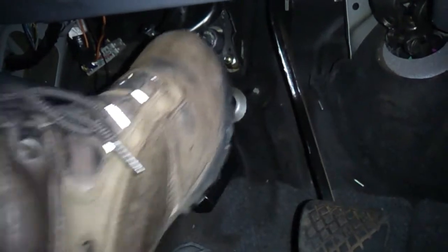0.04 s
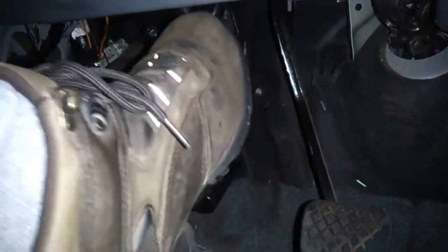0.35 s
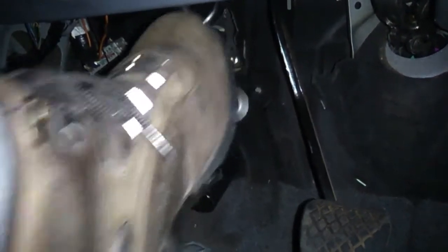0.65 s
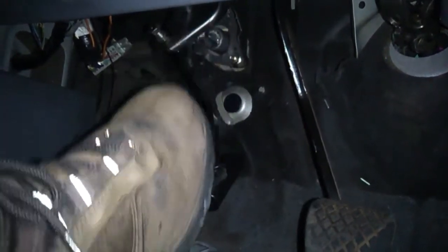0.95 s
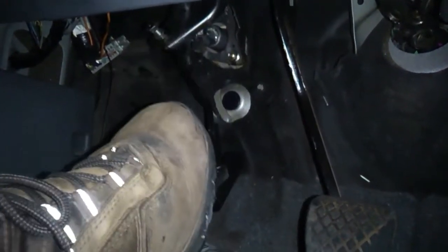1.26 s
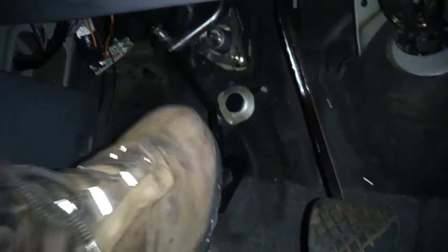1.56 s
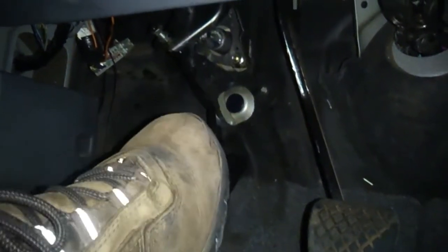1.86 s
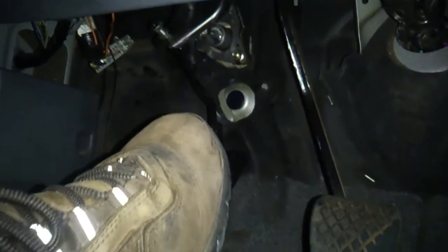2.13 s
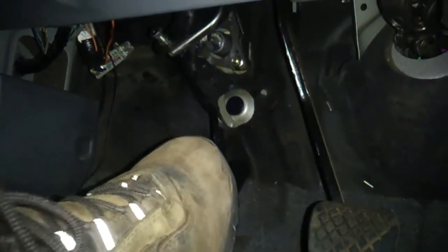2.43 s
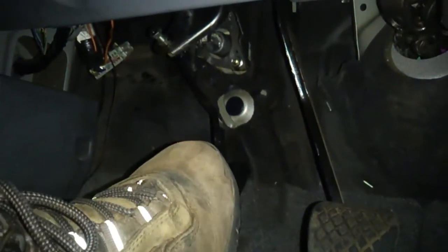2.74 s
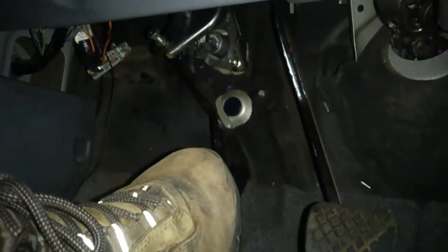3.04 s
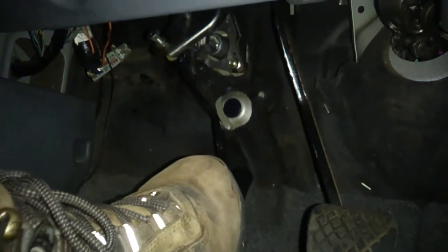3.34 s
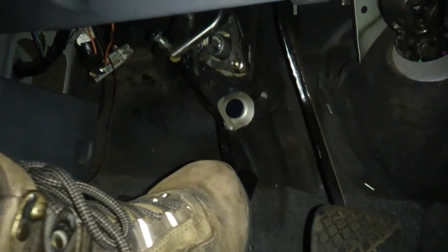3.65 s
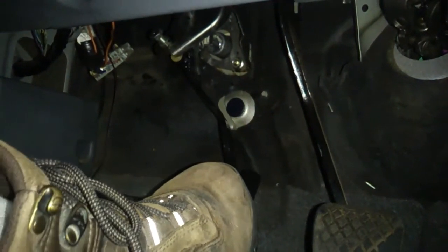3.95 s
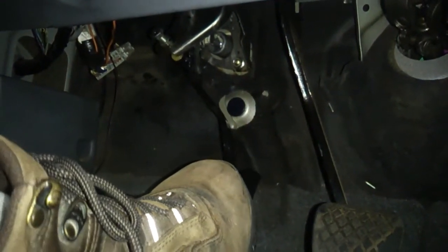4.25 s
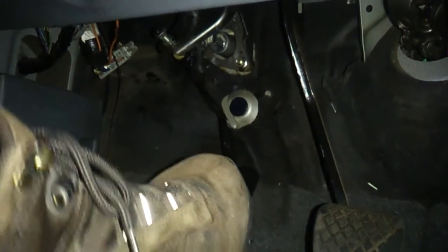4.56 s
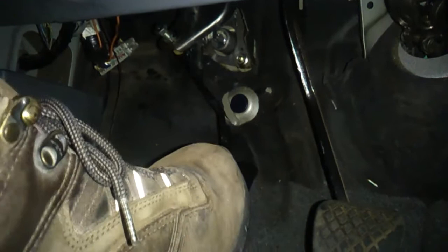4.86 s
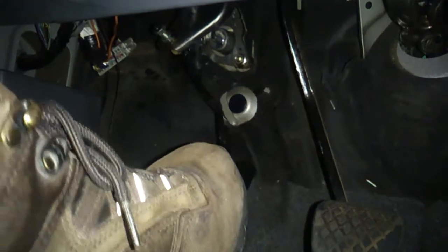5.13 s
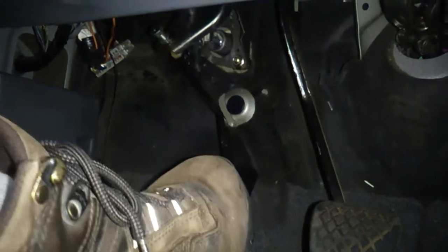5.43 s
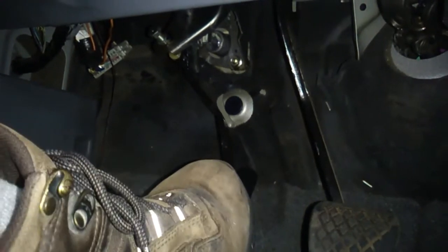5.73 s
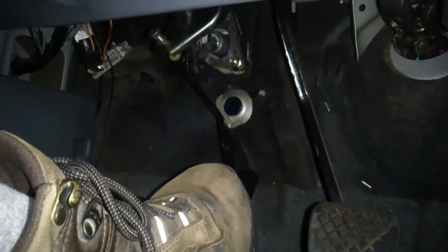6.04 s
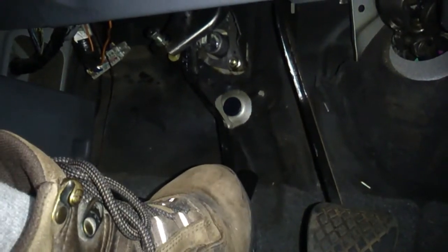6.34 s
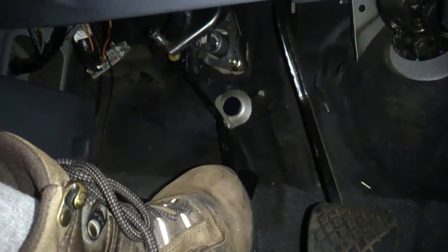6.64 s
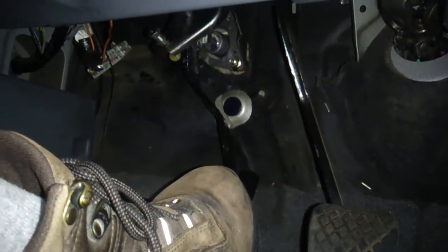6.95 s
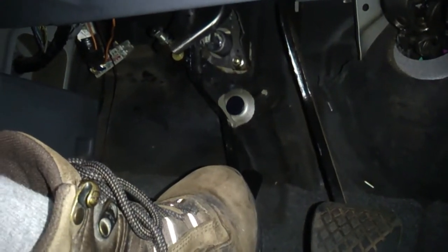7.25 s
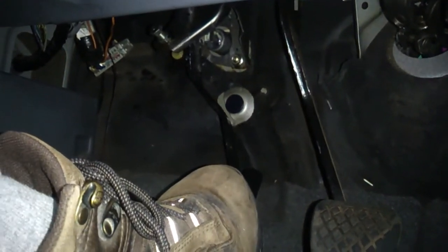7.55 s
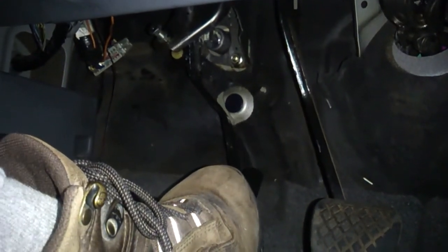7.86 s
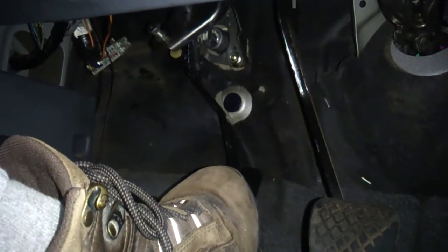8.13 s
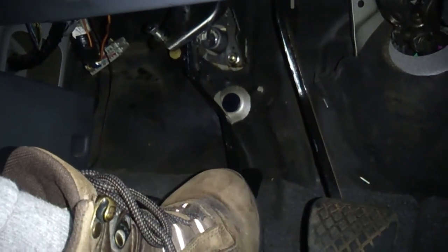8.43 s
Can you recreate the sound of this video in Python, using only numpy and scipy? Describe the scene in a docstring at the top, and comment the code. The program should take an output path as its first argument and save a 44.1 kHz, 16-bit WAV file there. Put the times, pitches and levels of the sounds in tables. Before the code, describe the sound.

Close microphones in a car footwell pick up a boot scuffing and ticking lightly on a pedal, with dull knocks and one heavier, booming thud. From about halfway, the clutch pedal gives five crisp metallic clicks at a slow, fairly regular pace as it is worked. Behind this are a steady faint hiss, a low cabin rumble and two brief spells of distant engine hum.

```python
"""In the footwell of a parked car, a boot presses and releases the clutch pedal, which clicks
sharply as it snaps against its bracket. Before that the boot shifts with small ticks, rubs and
dull knocks; the heaviest knock makes the cabin boom. Beneath it all lie a faint low rumble,
a distant engine and the hiss of two close microphones."""
import sys
import numpy as np
from scipy import signal
from scipy.fft import rfft, irfft, next_fast_len
from scipy.io import wavfile
from scipy.ndimage import uniform_filter1d

SR = 44100
rng = np.random.default_rng(int(sys.argv[2]) if len(sys.argv) > 2 else 0)


def wav_record(signal):
    """Record a signal, one row per channel, as 16-bit PCM in the file named by sys.argv[1]."""
    frames = np.transpose(np.atleast_2d(signal))
    bounded = np.clip(frames, -1, 1)
    # unit amplitude maps onto the largest positive 16-bit level
    quanta = np.round(bounded * 32767).astype(np.int16)
    wavfile.write(sys.argv[1], SR, quanta)


N = 374409


def amp(db):
    """Turn decibels into a number to multiply by."""
    return 10 ** (np.asarray(db) / 20)


def unit(x):
    """Scale a signal to an average strength (rms) of 1."""
    return x / np.sqrt(np.mean(x ** 2) + 1e-20)


def along(points, hz):
    """Read between (frequency, value) points, with the octaves evenly spaced."""
    freqs, values = np.transpose(points)
    return np.interp(np.log(hz + 1), np.log(freqs), values)


def filtered(x, response):
    """Turn each frequency in x up or down by response(hz)."""
    size = x.shape[-1]
    padded = next_fast_len(size + SR // 10)
    gain = response(np.fft.rfftfreq(padded, 1 / SR))
    return irfft(rfft(x, padded) * gain, padded)[..., :size]


def noise(spectrum, size, apart_hz):
    """Stereo noise of strength 1; left and right are alike below apart_hz and differ above it."""
    mid, side = rng.standard_normal((2, size))
    spread = lambda hz: np.pi / 4 * hz / np.hypot(hz, apart_hz)
    mid = filtered(mid, lambda hz: amp(along(spectrum, hz)) * np.cos(spread(hz)))
    side = filtered(side, lambda hz: amp(along(spectrum, hz)) * np.sin(spread(hz)))
    return unit(np.array([mid + side, mid - side]))


def strike(t, rise_s, ring_s):
    """Loudness of a blow: it builds over rise_s and dies away by 60 dB in the ring time, ring_s."""
    return (1 - np.exp(-(t / rise_s) ** 2)) * amp(-60 * t / ring_s)


def add(track, at_s, sound):
    """Mix a sound into the track at the given time."""
    start = round(at_s * SR)
    part = sound[..., :N - start]
    track[:, start:start + part.shape[-1]] += part


# The tone of the hiss: (frequency [Hz], relative level [dB])
HISS_TONE = [(100, 10.5), (500, 7), (1000, 4.5), (2000, 1.5), (2700, 2.5), (4000, 0), (8000, 0),
             (12000, -3), (13800, -1), (16000, -5.5)]

def hiss():
    """The microphones hiss steadily."""
    return amp(-59.5) * amp([[-.5], [.5]]) * noise(HISS_TONE, N, apart_hz=515)


# How the rumble rises and falls: (time [s], level [dB])
RUMBLE_LOUDNESS = [(0, -48.5), (2.2, -45), (2.7, -49.5), (5.8, -49), (6.4, -47), (8.49, -48)]
# The tone of the rumble: (frequency [Hz], relative level [dB])
RUMBLE_TONE = [(12, -12.5), (18, 4.5), (26, -6), (34, 1.5), (44, -3.5), (60, 1.5), (78, -4.5), (110, -10.5),
               (150, -19), (250, -24), (500, -32), (1200, -51)]

def rumble():
    """A low rumble fills the cabin, its deepest part stronger on the right."""
    level_db = np.interp(np.arange(N) / SR, *np.transpose(RUMBLE_LOUDNESS))
    bass = noise(RUMBLE_TONE, N, apart_hz=112)
    lean_db = lambda hz: along([(40, 5.0), (130, -1.5)], hz)
    return amp(level_db) * filtered(bass, lambda hz: amp([-lean_db(hz), lean_db(hz)]))


# The two spells of engine hum: (start [s], length [s], first firing rate [Hz], final rate [Hz],
# settling time [s], level [dB], fade [dB/s], octave above against the main note [dB])
ENGINE_SPELLS = [(0, 2, 48.94, 62.2, .65, -46.5, -3.5, -10.5),
                 (3.88, 2.4, 75.12, 59.53, 0.3018, -47.5, -3.5, -30)]

def engine(swell_s=0.21):
    """A distant engine speeds up and later slows; only its two lowest tones get into the cabin."""
    out = np.zeros((2, N))
    for at_s, length, first_hz, final_hz, settle_s, db, fade_db_per_s, octave_db in ENGINE_SPELLS:
        t = np.arange(round(length * SR)) / SR
        firing_hz = final_hz + (first_hz - final_hz) * np.exp(-t / settle_s)
        phase = 2 * np.pi * np.cumsum(firing_hz) / SR
        hum = np.sin(phase) + amp(octave_db) * np.sin(2 * phase)
        swell = np.clip(np.minimum(t, length - t) / swell_s, 0, 1)
        loudness = swell * amp(db + fade_db_per_s * t)
        add(out, at_s, np.sqrt(2) * amp([[-2.5], [2]]) * loudness * hum)
    return out


def contact(bright_tone, bright_loudness, dull_tone, dull_loudness):
    """Boot on pedal: bright noise aimed at the right microphone, and dull noise that reaches both."""
    size = len(bright_loudness)
    bright = amp([[-10], [3]]) * noise(bright_tone, size, apart_hz=900)
    dull = noise(dull_tone, size, apart_hz=1070)
    return bright * bright_loudness + dull * dull_loudness


# Slides of the sole: (middle [s], length [s], dull level [dB], bright level [dB])
SOLE_RUBS = [(0.513, 0.34, -63.5, -65), (1.045, 0.037, -61, -72), (1.156, 0.087, -64, -66),
             (2.211, 0.063, -52.5, -66), (4.647, 0.079, -65, -61), (4.766, 0.22, -80, -60),
             (5.345, 0.09, -81, -62.5)]
# The dull and bright parts of a rub: (frequency [Hz], relative level [dB])
SCUFF_TONE = [(150, 0), (380, 4), (650, -8), (950, -5), (1500, -15), (2500, -29), (8000, -32)]
SWISH_TONE = [(500, -21), (3500, -5), (6000, -3), (8500, 2), (12000, -5), (16000, -10)]

def rubs():
    """The sole slides over the pedal pad and its tread catches unevenly."""
    out = np.zeros((2, N))
    t = np.arange(SR // 2) / SR - 1 / 4  # zero at the middle of the rub
    for at_s, length, dull_db, bright_db in SOLE_RUBS:
        stroke = np.exp(-(2 * t / length) ** 2)
        wobble = unit(uniform_filter1d(rng.standard_normal(len(t)), size=200))
        grip = unit(amp(2.3 * wobble))
        rub = contact(SWISH_TONE, amp(bright_db) * stroke * grip, SCUFF_TONE, amp(dull_db) * stroke)
        add(out, at_s + t[0], rub)
    return out


# The bright snap of a tap: (frequency [times the strongest one], relative level [dB])
SNAP_TONE = [(.025, -33), (.4, -27), (.7, -9), (.87, 0), (1, 5.5), (1.15, -5), (1.4, -8), (2, -18)]
# The dull body of a tap: (frequency [Hz], relative level [dB])
BODY_TONE = [(60, 14), (170, -6), (330, -0.5), (700, -6), (1400, -9.5), (4000, -13.5), (10000, -23)]

def tap(snap_db, peak_hz, body_db, rise_s=0.00098, ring_s=0.026):
    """One touch: a bright snap over a dull body that builds and dies more slowly."""
    t = np.arange(SR // 4) / SR
    snap = amp(snap_db) * strike(t, rise_s, ring_s)
    body = amp(body_db) * strike(t, 1.8 * rise_s, 2.14 * ring_s)
    return contact(np.array(SNAP_TONE) * [peak_hz, 1], snap, BODY_TONE, body)


# Single ticks: (time [s], snap level [dB], strongest snap frequency [Hz], body level [dB])
BOOT_TICKS = [(.502, -45.5, 7960, -51), (1.164, -47.5, 10000, -61), (1.222, -44, 8130, -64),
              (1.393, -40.5, 9200, -66), (2.017, -48, 8300, -65), (2.075, -47.5, 8360, -60),
              (2.468, -42.5, 8640, -61), (2.759, -32, 8440, -56), (4.570, -62, 8000, -43),
              (5.2986, -40, 7340, -57), (6.852, -49, 6000, -47)]
# Spells of fainter ticks: (start [s], end [s], count, snap level [dB], body level [dB])
FAINT_TICKS = [(0.439, 0.554, 2, -49, -57), (1.129, 1.2, 2, -51, -48), (6.104, 7.799, 5, -58, -59)]

def ticks(faint_peak_hz=8700, scatter_db=1.5):
    """Boot and pedal linkage tick as the foot shifts: some at set times, fainter ones at random."""
    out = np.zeros((2, N))
    for at_s, snap_db, peak_hz, body_db in BOOT_TICKS:
        add(out, at_s, tap(snap_db, peak_hz, body_db))
    for start, end, count, snap_db, body_db in FAINT_TICKS:
        for at_s in rng.uniform(start, end, size=round(count)):
            stray_db = scatter_db * rng.standard_normal()
            add(out, at_s, tap(snap_db + stray_db, faint_peak_hz, body_db + stray_db))
    return out


# Landings of the sole: (time [s], thud level [dB], high-note boost [dB/octave], slap level [dB])
SOLE_KNOCKS = [(0.571, -13.5, 0, -47.5), (1.588, -12.5, 4.5, -36), (1.632, 1, 0, -34.5),
               (2.306, -9, 2, -49)]
# The notes the floor rings at: (frequency [Hz], level [dB], ring time [s])
FLOOR_NOTES = [(91.4, -25.5, 0.084), (155, -32, 0.2), (238.4, -27, 0.1), (328, -27.5, 0.052),
               (483, -41, 0.066), (622, -37.5, 0.055), (1340, -39, 0.029)]

def knocks(thud_lag_s=0.001):
    """The sole slaps down and the floor thuds; a sharper landing brings out its higher notes."""
    out = np.zeros((2, N))
    t = np.arange(SR // 2) / SR
    for at_s, thud_db, boost_db, slap_db in SOLE_KNOCKS:
        # a whole sole lands more softly and for longer than a tick
        slap = tap(slap_db, peak_hz=8500, body_db=slap_db - 3, rise_s=0.0029, ring_s=0.057)
        add(out, at_s, slap)
        for hz, db, ring_s in FLOOR_NOTES:
            gain = amp(thud_db + db + boost_db * np.log2(hz / 230))
            note = np.sin(2 * np.pi * (hz * t + rng.random()))
            add(out, at_s + thud_lag_s, gain * note * strike(t, 0.006, ring_s))
    return out


def boom(peak_s=1.708, hz=39, swell_s=0.045, fade_s=0.07):
    """After the heaviest knock the air in the cabin swells in one low boom."""
    t = np.arange(N) / SR - peak_s
    swell = np.exp(-(t / np.where(t < 0, swell_s, fade_s)) ** 2)
    return amp(-21.5) * amp([[-3.5], [2.5]]) * np.cos(2 * np.pi * hz * t) * swell


# The notes of pedal and bracket: (frequency [Hz], left level [dB], right level [dB], ring time [s])
PEDAL_NOTES = [(210, -48, -43, 0.22), (327, -19, -19, 0.037), (432, -43, -37, 0.17),
               (674, -27.5, -31.5, 0.074), (787, -37, -32.5, 0.078), (1056, -51.5, -43.5, 0.14),
               (1255, -28.5, -26, 0.077), (1352, -27, -25, 0.054), (1444, -33, -24, 0.064),
               (1810, -23.5, -24.5, 0.058), (1928, -22, -25, 0.043), (1986, -29, -27.5, 0.037),
               (2330, -31, -33.5, 0.063), (2698, -21.5, -51, 0.035), (2910, -25.5, -30, 0.03),
               (3240, -22, -34, 0.049), (3690, -27, -33, 0.035), (4280, -31.5, -30.5, 0.036),
               (6290, -49, -21.5, 0.03), (6320, -48, -41, 0.022), (7250, -48, -33, .036),
               (7530, -45, -21.5, 0.034), (8000, -55, -13.5, 0.022), (8700, -47, -44, 0.02),
               (8940, -46, -23, 0.023)]

def pedal_ring(t, first_sides, scatter_db=1.0, mic_delay_s=0.00018):
    """Pedal and bracket ring; each note reaches one microphone first (+1 left, -1 right)."""
    ring = np.zeros((2, len(t)))
    for (hz, left_db, right_db, ring_s), side in zip(PEDAL_NOTES, first_sides):
        head_start = side * mic_delay_s / 2 * np.array([[1], [-1]])
        gain = amp(np.array([[left_db], [right_db]]) + scatter_db * rng.standard_normal())
        note = side * np.sin(2 * np.pi * hz * (t + head_start))
        ring += gain * note * strike(t, 0.0026, ring_s)
    return ring


# The tone of the crack in each click: (frequency [Hz], left level [dB], right level [dB])
CRACK_TONE = [(81.4, 8, 2.5), (300.1, 8.5, 8), (610, 7.5, 6), (1030, 4, 2.5), (1500, -1, -1.5),
              (2020, 9.5, 4), (2500, 6.5, 1.5), (3400, 6.5, 7), (5130, -4.5, 4.5), (6660, -3, 7.5),
              (8700, -7, 13), (10230, -19, 0), (12500, -21, -5.5), (16000, -29, -21)]
# How long the crack lasts: (frequency [Hz], ring time [s])
CRACK_RING_TIMES = [(150, 0.44), (400, 0.12), (1000, 0.1), (2800, 0.056), (7300, 0.045), (13000, 0.031)]

def pedal_crack(t, rise_s=0.0011):
    """A crowd of short notes and footwell echoes blurs into a crack; the highs die first."""
    white = noise([(100, 0), (10000, 0)], len(t), apart_hz=900)
    band_hz, when, bands = signal.stft(white, SR, nperseg=128)
    fade = amp(-60 * when / along(CRACK_RING_TIMES, band_hz)[:, None])
    dying = signal.istft(bands * fade, SR, nperseg=128)[1][:, :len(t)]
    spectrum = rfft(dying * (1 - np.exp(-(t / rise_s) ** 2)))
    # the crowd is dense, so even out the energy before giving it its tone
    energy = np.abs(uniform_filter1d(np.abs(spectrum) ** 2, size=60))
    even = irfft(spectrum / np.sqrt(energy + 1e-12), len(t))
    freqs, left_db, right_db = np.transpose(CRACK_TONE)
    left, right = np.c_[freqs, left_db], np.c_[freqs, right_db]
    return filtered(even, lambda hz: amp([along(left, hz), along(right, hz)]))


# Each click and the boost or cut of its parts, from low to high:
# (time [s], relative level [dB], thump [dB], knock [dB], clank [dB], clack [dB], top [dB])
PEDAL_CLICKS = [(3.8890, 0.5, -3, -3.5, -0.5, 0.5, 0), (4.6682, -4, -5.5, -8, -2, -0.5, -1.5),
                (5.8827, -1.5, -1.5, 0, 1, 1.5, 2), (6.9862, 0, 1, 1.5, 0, -4, 2),
                (8.1770, 1.2, 1, -0.5, 0.5, 3, -3.5)]

def clicks(alike=0.77):
    """The pedal sticks, lets go and snaps against its bracket, in much the same way each time."""
    out = np.zeros((2, N))
    t = np.arange(SR // 5) / SR
    fade_out = np.cos(np.pi / 2 * t / t[-1])
    first_sides = rng.choice([-1, 1], size=len(PEDAL_NOTES))
    shared_crack = pedal_crack(t)
    for at_s, db, thump_db, knock_db, clank_db, clack_db, top_db in PEDAL_CLICKS:
        crack = np.sqrt(alike) * shared_crack + np.sqrt(1 - alike) * pedal_crack(t)
        click = (amp(1.3) * pedal_ring(t, first_sides) + amp(-0.15) * crack) * fade_out
        # the way the pedal lands decides which of its parts ring most
        tone = [(330, thump_db), (650, knock_db), (1450, clank_db), (1950, clack_db),
                (4000, 0), (8000, 0), (12500, top_db)]
        add(out, at_s, amp(db) * filtered(click, lambda hz: amp(along(tone, hz))))
    return out


def scene():
    """Everything heard in the footwell."""
    return clicks() + ticks() + rubs() + knocks() + boom() + engine() + rumble() + hiss()


def record(dry):
    """Nothing above 16000 Hz gets through."""
    return filtered(dry, lambda hz: hz < 16000)


dry = scene()
out = record(dry)
wav_record(out)
```